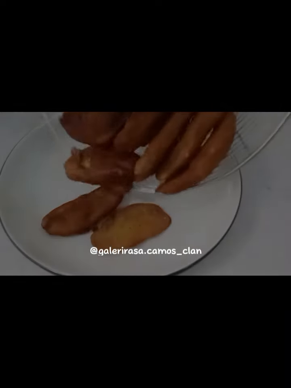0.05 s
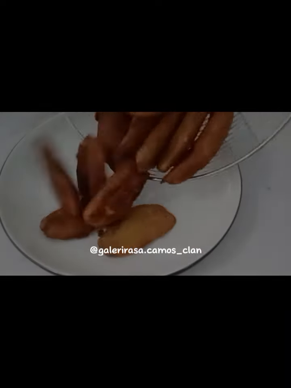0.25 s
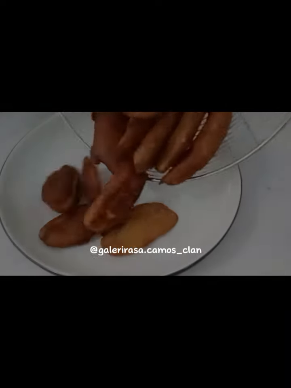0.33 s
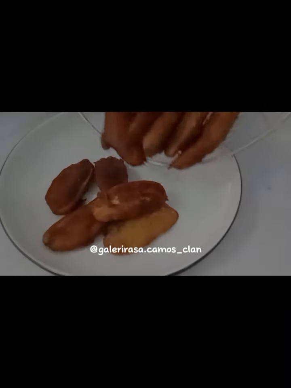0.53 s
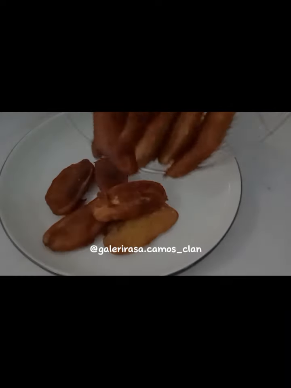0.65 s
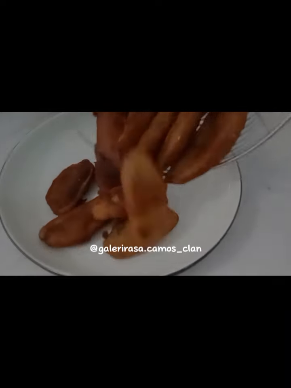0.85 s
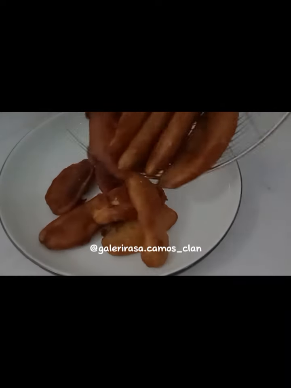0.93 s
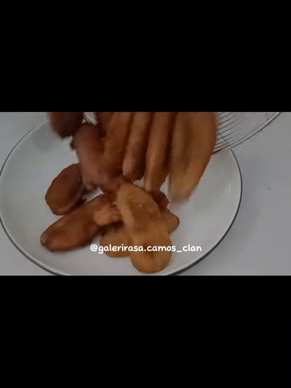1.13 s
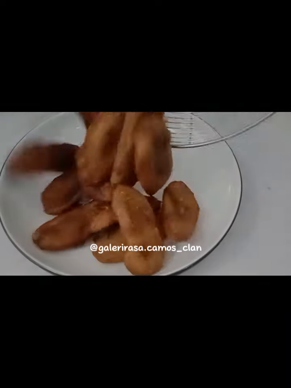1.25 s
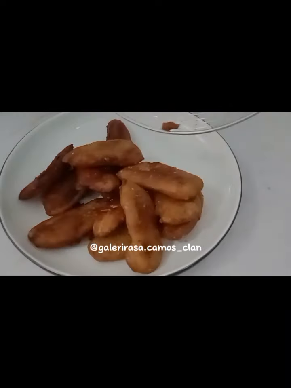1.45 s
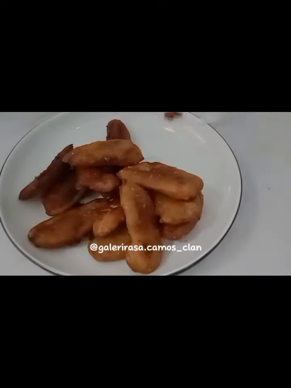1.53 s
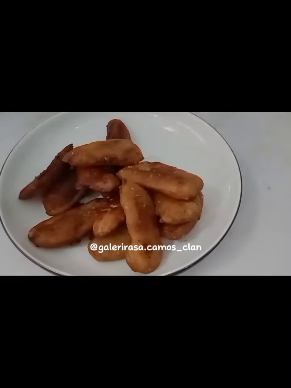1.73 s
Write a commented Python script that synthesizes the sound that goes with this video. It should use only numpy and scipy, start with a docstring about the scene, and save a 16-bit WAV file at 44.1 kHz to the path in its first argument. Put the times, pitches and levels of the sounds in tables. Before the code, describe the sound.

A metal strainer clinks on a ceramic plate as crisp fried slices slide out, with rasping and ringing clacks from about 0.2 to 0.5 seconds. After a brief lull, more slices crunch and thump down from 0.8 seconds among further clinks, loudest near 1.3. The plate rings again around 1.5, and the wires jingle lightly at 1.7. The sound is close, with a short kitchen echo.

```python
"""A small kitchen, one microphone close to a ceramic plate. Crisp fried banana slices are tipped onto
it from a wire strainer. The crusts rasp as they slide, then land with a crunch and a soft thump.
The plate rings when it is hit; the strainer clinks against it and jingles as it is shaken empty.
Behind them are a short echo off the walls and quiet room noise."""
import sys
import numpy as np
from scipy import signal
from scipy.fft import rfft, irfft
from scipy.io import wavfile

SR = 44100
rng = np.random.default_rng(int(sys.argv[2]) if len(sys.argv) > 2 else 0)


def log_audio(samples):
    """Write samples as a 16-bit WAV file to the path given in sys.argv[1]."""
    # one column per channel
    frames = np.atleast_2d(samples).T
    # limit to full scale, then quantise
    limited = np.clip(frames, -1, 1)
    pcm = np.round(limited * 32767).astype(np.int16)
    wavfile.write(sys.argv[1], SR, pcm)


N = 79380
TIME = np.arange(N) / SR

# Crusts sliding over the wires and each other: time_s, level_db, extra_treble_db
SLIDE = [(0, -52.5, -15), (.083, -63, -11.5), (.142, -52, -1), (.162, -33.5, 0.5), (.21, -30, -0.5),
         (.262, -23.5, 0), (.33, -30, -0.5), (.41, -37.5, -3.5), (.49, -40, 1.5), (.58, -55.5, -8),
         (.70, -77, -18), (.745, -46.5, -1), (.80, -35.5, 1.5), (.84, -42.5, -6), (.94, -25, -4),
         (.99, -39, -4), (1.062, -53, 1), (1.078, -22.5, -31), (1.14, -29, 1), (1.188, -31, 2),
         (1.21, -27, 6.5), (1.26, -22.5, 1), (1.33, -32, 7.5), (1.38, -25, -0.5), (1.45, -38.5, -6),
         (1.50, -41.5, -3), (1.57, -53, 1), (1.66, -60.5, -6), (1.695, -37, 12), (1.76, -54, 2),
         (1.8, -51, -10)]
# Slices landing: peak_s, level_db, extra_body_db, extra_treble_db, rise_s, t60_s
LANDINGS = [(0.099, -34.5, 4.5, 1, 0.0045, 0.095), (.716, -39, 0, 0.5, 0.0035, 0.064),
            (0.869, -25.5, -20, -2.5, 0.025, 0.13), (0.889, -17, 3.5, 2, .002, 0.026),
            (1.095, -15.5, -4.5, 5, 0.0091, 0.074), (1.236, -9, 1.5, -1, 0.0046, 0.058),
            (1.255, -21.5, -4, -1, 0.0027, 0.076), (1.279, -25, 9, 13, 0.0014, 0.026),
            (1.474, -25, 12.5, 6, .011, 0.083)]
# Breaking crust, heard close: frequency_hz, level_db
CRUST_SPECTRUM = [(100, -39.5), (250, -9.5), (480, -6.5), (900, 3), (1450, -1), (2350, 3.5), (3000, -2.5),
                  (3700, -2), (4600, -15), (5800, -14.5), (6800, -23), (8000, -17), (9500, -9),
                  (11200, -22), (15500, -25.5)]

def crusts(body_edge_hz=1620, treble_edge_hz=5300):
    """Sliding and landing both break the crust; the crunch's body, middle and treble follow them."""
    slide_db, extra_db = in_time(SLIDE)
    band_power = from_db([slide_db, slide_db, slide_db + extra_db]) ** 2
    for peak_s, db, body_db, treble_db, rise_s, t60_s in LANDINGS:
        band_gains = from_db([[db + body_db], [db], [db + treble_db]])
        band_power += (band_gains * swell(peak_s, rise_s, t60_s)) ** 2
    crunch_spectrum = rfft(colour(crackle(), CRUST_SPECTRUM))
    hz = np.fft.rfftfreq(N, 1 / SR)
    body, below_treble = [1 / (1 + (hz / edge) ** 6) for edge in (body_edge_hz, treble_edge_hz)]
    bands = irfft(crunch_spectrum * np.array([body, below_treble - body, 1 - below_treble]), N)
    return np.sum(bands * np.sqrt(band_power), axis=0)


def crackle(fractures_per_s=2200, spread_db=3):
    """Tiny fractures of uneven size over a fine rasp, coming in clumps."""
    sizes = from_db(spread_db * np.minimum(rng.exponential(1, N), 4))
    signs = rng.choice([-1, 1], N)
    fractures = rms_one(sizes * signs * (rng.random(N) < fractures_per_s / SR))
    clumps = flutter(depth_db=1.3, below_hz=106.6)
    rasp = 0.44 * rng.standard_normal(N)
    return rms_one((fractures + rasp) * clumps)


# Weight of the pile tumbling on the plate: time_s, level_db
TUMBLE = [(0, -52.5), (.13, -50.5), (.18, -40.5), (.33, -35), (.45, -41.5), (.62, -54.5), (.78, -56.5),
          (.87, -43.5), (.91, -31), (1.05, -47), (1.09, -38.5), (1.19, -43.5), (1.26, -25.5), (1.31, -47),
          (1.40, -42.5), (1.50, -35.5), (1.59, -63), (1.8, -50)]
# Its dull tone: frequency_hz, level_db
TUMBLE_SPECTRUM = [(25, -27), (60, -11), (125, -1), (175, 0), (240, -7), (330, -5.5), (500, -20),
                   (1000, -34.5)]
# Soft knocks of the slices: peak_s, level_db, pitch_hz, t60_s
THUMPS = [(0.524, -24, 940, 0.034), (1.138, -23.5, 170.8, 0.14), (1.271, -35, 69, .09),
          (1.337, -29, 137, 0.12), (1.375, -22.5, 167, 0.056), (1.403, -25.5, 138, 0.22),
          (1.52, -41.5, 165, 0.1)]

def pile():
    """The soft weight of the slices: a low tumble and a few thumps."""
    bass_db, = in_time(TUMBLE)
    tumble = colour(rng.standard_normal(N) * from_db(bass_db), TUMBLE_SPECTRUM)
    thumps = sum(from_db(db) * ring(peak_s, hz, t60_s, rise_s=0.0013) for peak_s, db, hz, t60_s in THUMPS)
    return tumble + thumps


# Modes of the ceramic plate: pitch_hz
PLATE_HZ = [742, 1831, 3213, 4723, 6368, 7335, 8043, 9266, 9800, 11197, 13272, 13960, 14510]
# The same modes ringing freely: level_db, t60_s
PLATE_RING = [(0.5, 0.27), (0, 0.35), (-2.5, 0.16), (-2, 0.47), (-7.5, 0.14), (-8, 0.34), (-2.5, 0.07),
              (5.5, 0.2), (-7.5, 0.14), (-5, 0.18), (-10.5, 0.14), (-19, 0.11), (-10, 0.06)]
# Blows on the plate; the spot decides which modes ring:
# peak_s, first_mode_db, second_mode_db, third_mode_db, upper_modes_db, tilt_db_per_octave, rise_s, t60_ratio
PLATE_BLOWS = [(.002, -47, -41.5, -60, -74, -4, 0.0034, 0.92),
               (0.33, -10, -14, -11.5, -46, -1, 0.011, 0.28),
               (.335, -35, -24.5, -5, -37.5, -13, 0.0049, 0.42),
               (.359, -17, -17.5, -22.5, -66, 6, 0.0088, 1.1),
               (.387, -16.5, -25.5, -37, -60, 6, 0.00085, 1.13),
               (.432, -21.5, -44, -51, -64, 3, 0.0028, 1.04), (.970, -21, -31.5, -42, -47, 10, 0.028, 0.8),
               (1.276, -33, -12.5, -8.5, -23.5, 15, 0.0035, 0.72),
               (1.33, -31.5, -49, -18.5, -55, -6, 0.021, 0.22),
               (1.476, -25, -34, -21, -33, 18, 0.0095, 0.71),
               (1.497, -15.5, -16, -26, -54.5, -9, 0.016, 0.4)]

def plate(twin_split_hz=16, twin_db=-12.5):
    """The plate rings in beating pairs of modes, damped by the food that lies on it."""
    out = np.zeros(N)
    octaves = np.log2(PLATE_HZ[3:])
    for peak_s, *low_modes_db, upper_db, tilt, rise_s, t60_ratio in PLATE_BLOWS:
        strengths_db = np.r_[low_modes_db, upper_db + tilt * (octaves - octaves.mean())]
        for hz, (db, t60_s), strength_db in zip(PLATE_HZ, PLATE_RING, strengths_db):
            mode = ring(peak_s, hz, t60_s * t60_ratio, rise_s)
            twin = ring(peak_s, hz + twin_split_hz, t60_s * t60_ratio, rise_s)
            out += from_db(db + strength_db) * (mode + from_db(twin_db) * twin)
    return out


# Hard contacts of the strainer: start_s, clack_db, tick_db, frame_db, wires_db
CLINKS = [(.032, -22.5, -34.5, -61, -65), (0.1986, -7, -13.5, -46, -47), (0.332, 6, 1, -47, -51),
          (0.3846, 10, -27, -11.5, -38), (0.4314, 3, -6, -19.5, -29), (.488, -9.5, -18.5, -36, -53),
          (0.5229, -12.5, -33, -35, -54), (0.796, -21, -15, -37.5, -62), (.8435, -8, -18, -47, -56),
          (.885, -10, -12, -40, -50), (.9255, 5.5, -9, -12.5, -36.5), (.9755, -4.5, -9, -36, -44),
          (1.092, -16, -11, -44, -34), (1.136, -6, -16, -53, -34.5), (1.201, -4, -19, -29, -65),
          (1.2733, 10, -9, -38, -42), (1.276, 8, 7.5, -45, -26), (1.3551, -3, -1.5, -39, -35.5),
          (1.559, -18, -29, -45.5, -46), (1.6846, -7, -13, -55, -32.5), (1.7743, -32, -40, -38, -49.5)]
# The low clack and bright tick of a contact: frequency_hz, level_db
CLACK_SPECTRUM = [(100, -23.5), (350, -9), (600, -1), (950, 3.5), (1400, -2), (2300, -4.5), (3600, -3),
                  (5000, -18), (15000, -47)]
TICK_SPECTRUM = [(1000, -16), (4000, -1.5), (5400, 4), (6800, -5.5), (9700, 9), (12000, -9), (15500, -2.5)]
# Modes of the strainer's frame and wires: pitch_hz, level_db, t60_s
FRAME_MODES = [(2278, 2, 0.067), (2182, -16, 0.26), (2298, -11.5, .17), (3572, 4.5, 0.025),
               (3670, -18.5, 0.23)]
WIRE_MODES = [(5426, -0.5, 0.11), (6150, -7, 0.075), (7446, -10, 0.093), (7640, -7.5, 0.039),
              (9180, 0, 0.056), (9960, 3, 0.076), (11500, -17, .1), (12700, -27, .12), (13500, -16.5, 0.12),
              (15450, -24, .1)]

def strainer_clinks():
    """Each contact gives a clack and a tick and rings the wires and the loose, rattling frame."""
    start_s, clack_db, tick_db, frame_db, wires_db = np.transpose(CLINKS)
    rattle = rms_one(flutter(depth_db=2.5, below_hz=112))
    frame = struck(start_s, frame_db, FRAME_MODES) * rattle
    wires = struck(start_s, wires_db, WIRE_MODES)
    clacks = contact(start_s, clack_db, CLACK_SPECTRUM, click_db=0, chatter_db=-2.5)
    ticks = contact(start_s, tick_db, TICK_SPECTRUM, click_db=-6.5, chatter_db=0)
    return clacks + ticks + frame + wires


def struck(start_s, level_db, modes, scatter_db=3):
    """Every blow rings every mode with a strength of its own."""
    offsets_db = scatter_db * rng.standard_normal((len(start_s), len(modes)))
    return sum((-1) ** k * resonate(clicks(start_s, level_db + offsets_db[:, k]), [mode])
               for k, mode in enumerate(modes))


def contact(start_s, level_db, spectrum, click_db, chatter_db):
    """Hard surfaces meet: a click wrapped in a few milliseconds of chatter."""
    gains = from_db(level_db + chatter_db)
    chatter = sum(gain * burst(t60_s=0.015, peak_s=s, rise_s=0.00046) for s, gain in zip(start_s, gains))
    return colour(clicks(start_s, level_db + click_db) + chatter, spectrum)


# Slices brushing the wires: peak_s, level_db, rise_s, t60_s
SWISHES = [(.27, -44, 0.069, 0.25), (.868, -28.5, 0.015, 0.071), (1.10, -23.5, 0.0087, 0.11),
           (1.145, -36.5, 0.0084, .25), (1.225, -29, 0.018, .15)]
# Their thin tone: frequency_hz, level_db
SWISH_SPECTRUM = [(1500, -22), (2700, 2), (3500, 1.5), (4400, 0.5), (5100, -19), (5950, -2.5), (6700, -23),
                  (15000, -38)]

def swishes():
    """The crust of a slice crackles as it runs along the wires."""
    return colour(crackle() * swells(SWISHES), SWISH_SPECTRUM)


# Shakes of the strainer: peak_s, level_db, rise_s, t60_s
SHAKES = [(1.478, -49, .01, 0.057), (1.605, -54, .03, 0.11), (1.685, -34, 0.0068, 0.074),
          (1.722, -35.5, 0.0099, 0.1)]

def wire_shiver():
    """The wires shiver as the strainer is shaken empty."""
    return rms_one(resonate(rng.standard_normal(N), WIRE_MODES)) * swells(SHAKES)


# Modes of the loaded mesh: pitch_hz
MESH_HZ = [840, 934, 1263, 2407, 2736, 2913, 3107, 3560, 5850, 6020]
MESH_DB, MESH_T60_S = [5.5, 0.5, -6.5, 2, -0.5, 5.5, -2.5, 7, -7, -8], 0.073

def rubbing(crunch, loaded_t60_ratio=0.45, plate_db=-11.5, wires_db=-22, mesh_db=-10):
    """The scraping crusts keep the plate, the wires and the mesh softly ringing."""
    loaded_plate = [(hz, db, t60_s * loaded_t60_ratio) for hz, (db, t60_s) in zip(PLATE_HZ, PLATE_RING)]
    mesh = [(hz, db, MESH_T60_S) for hz, db in zip(MESH_HZ, MESH_DB)]
    bodies = [(loaded_plate, plate_db), (WIRE_MODES, wires_db), (mesh, mesh_db)]
    return crunch.std() * sum(from_db(db) * rms_one(resonate(crunch, modes)) for modes, db in bodies)


def kitchen_echo(near, level_db=-17):
    """The walls send a short, dulled echo back to the microphone."""
    reflections = lowpass(burst(t60_s=0.36), hz=4680)
    return from_db(level_db) * signal.fftconvolve(near, reflections)[:N]


# The kitchen's background noise: frequency_hz, level_db
ROOM_SPECTRUM = [(25, -20), (60, -0.5), (125, 4), (160, -6), (220, 2), (280, 0), (350, -17.5), (450, -2.5),
                 (700, -8.5), (1100, -12), (2200, -15), (3500, -21), (6000, -47), (15000, -53)]

def room_tone(level_db=-48.5):
    """Quiet, steady, low noise all around the microphone."""
    return from_db(level_db) * colour(rng.standard_normal(N), ROOM_SPECTRUM)


def from_db(db):
    """Decibels to gain."""
    return 10 ** (np.asarray(db) / 20)


def rms_one(x):
    """Scale to unit rms."""
    return x / np.sqrt(np.mean(x ** 2) + 1e-20)


def in_time(rows):
    """The columns of a curve, sample by sample."""
    time_s, *columns = np.transpose(rows)
    return [np.interp(TIME, time_s, column) for column in columns]


def lowpass(x, hz):
    """Second-order Butterworth low-pass."""
    return signal.sosfilt(signal.butter(2, hz, fs=SR, output="sos"), x)


def flutter(depth_db, below_hz):
    """A gain that wavers at random."""
    return from_db(depth_db * rms_one(lowpass(rng.standard_normal(N), below_hz)))


def colour(x, spectrum):
    """Causal filter with the given spectrum; white noise keeps its power."""
    hz, db = np.transpose(spectrum)
    grid_hz = np.maximum(np.fft.rfftfreq(2 * N, 1 / SR), 1)
    gains = rms_one(from_db(np.interp(np.log(grid_hz), np.log(hz), db)))
    cepstrum = irfft(np.log(gains))
    folded = np.r_[cepstrum[0], 2 * cepstrum[1:N]]  # minimum phase
    return irfft(rfft(x, 2 * N) * np.exp(rfft(folded, 2 * N)))[:N]


def swell(peak_s, rise_s, t60_s):
    """Exponential rise to a peak, then free decay."""
    t = TIME - peak_s
    return np.exp(np.where(t < 0, t / max(rise_s, 1e-5), -np.log(1000) * t / t60_s))


def swells(rows):
    """The joint envelope of several swells."""
    return sum(from_db(db) * swell(peak_s, rise_s, t60_s) for peak_s, db, rise_s, t60_s in rows)


def ring(peak_s, hz, t60_s, rise_s):
    """One mode swelling and dying away."""
    return np.sin(2 * np.pi * hz * (TIME - peak_s)) * swell(peak_s, rise_s, t60_s)


def burst(t60_s, peak_s=0, rise_s=0):
    """Dying noise of unit energy."""
    noise = rng.standard_normal(N) * swell(peak_s, rise_s, t60_s)
    return noise / np.linalg.norm(noise)


def clicks(start_s, level_db):
    """Single impulses at the given times and levels."""
    out = np.zeros(N)
    out[(start_s * SR).astype(int)] = from_db(level_db)
    return out


def resonate(drive, modes):
    """Pass a drive through modes of alternating sign; a unit click rings each at its own level."""
    out = np.zeros(N)
    for k, (hz, db, t60_s) in enumerate(modes):
        decay, angle = from_db(-60 / (t60_s * SR)), 2 * np.pi * hz / SR
        feedback = [1, -2 * decay * np.cos(angle), decay * decay]
        out += (-1) ** k * from_db(db) * signal.lfilter([0, np.sin(angle)], feedback, drive + 1e-18)
    return out


def scene():
    """Food, strainer and plate close up, in mono; the food and strainer echo in the kitchen."""
    crunch = crusts()
    near = crunch + rubbing(crunch) + pile() + wire_shiver() + swishes() + strainer_clinks()
    return (near + plate() + kitchen_echo(near) + room_tone())[None]


def record(dry, cutoff_hz=15550):
    """The loudest peaks overload the recorder, and the top of the treble is cut."""
    top_cut = signal.ellip(12, 0.1, 80, cutoff_hz, fs=SR, output="sos")
    return signal.sosfilt(top_cut, np.clip(dry, -1, 1))


dry = scene()
out = record(dry)
log_audio(out)
```